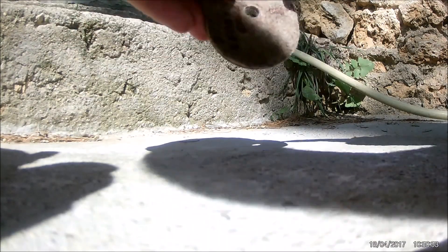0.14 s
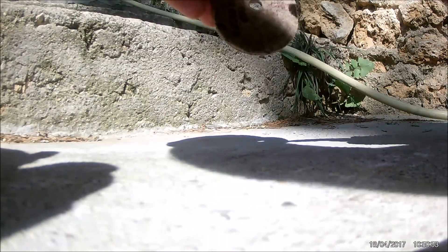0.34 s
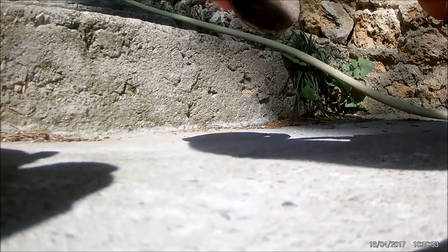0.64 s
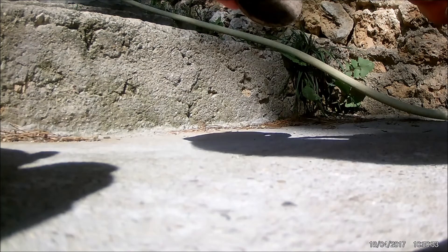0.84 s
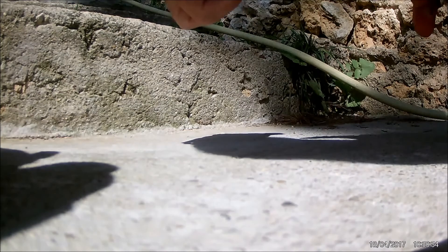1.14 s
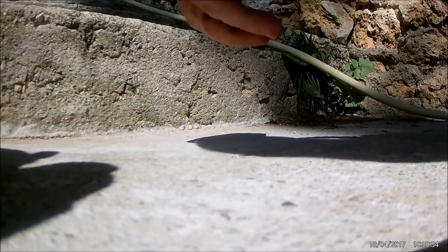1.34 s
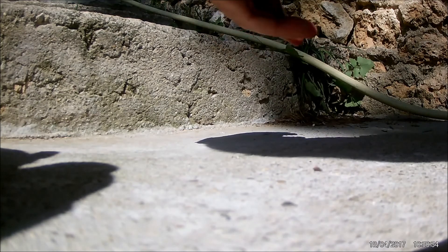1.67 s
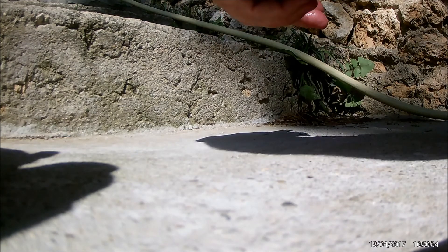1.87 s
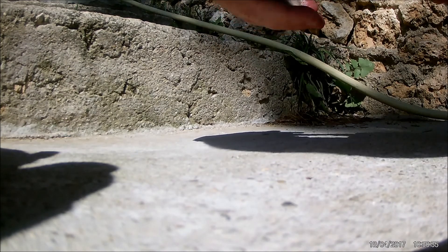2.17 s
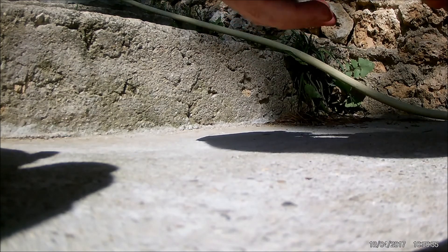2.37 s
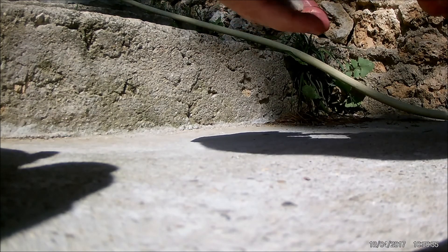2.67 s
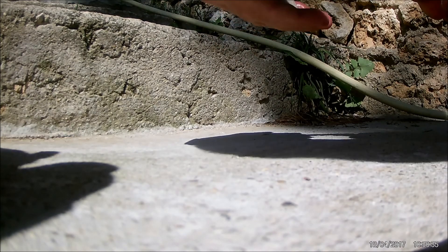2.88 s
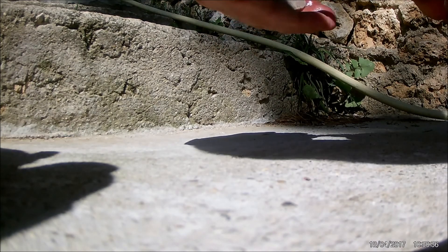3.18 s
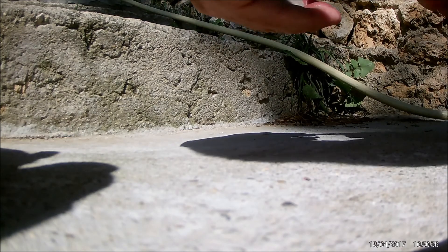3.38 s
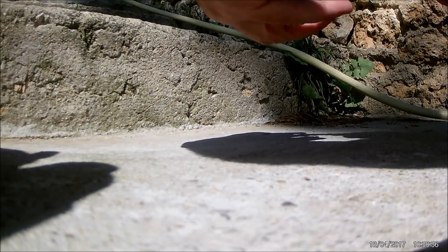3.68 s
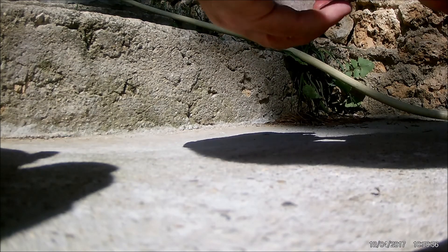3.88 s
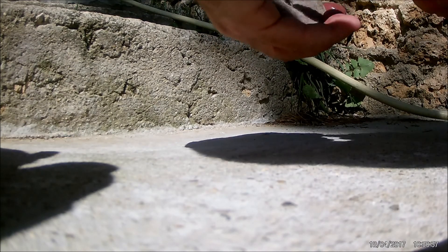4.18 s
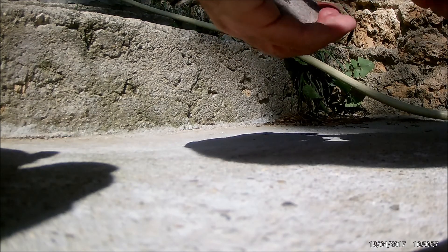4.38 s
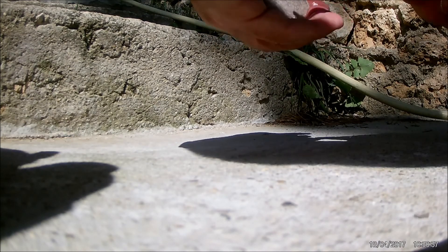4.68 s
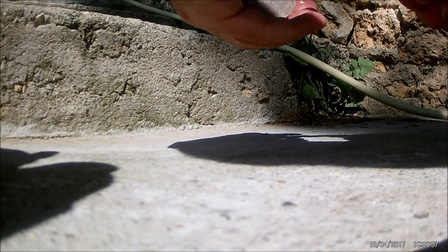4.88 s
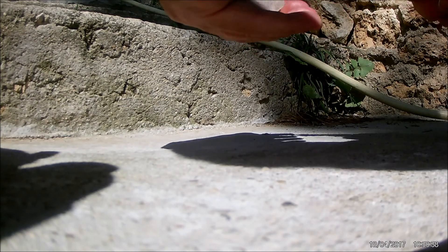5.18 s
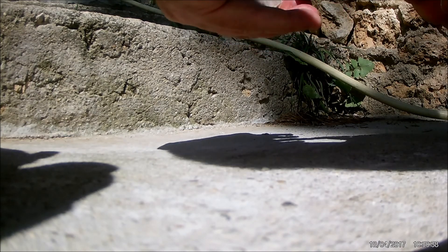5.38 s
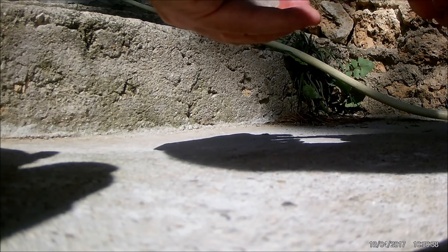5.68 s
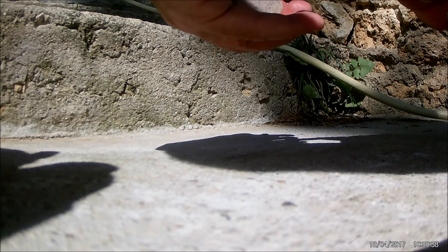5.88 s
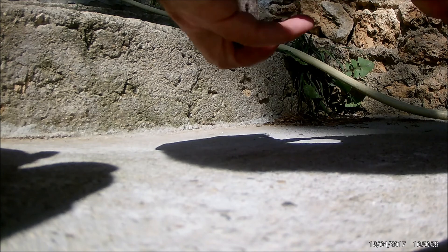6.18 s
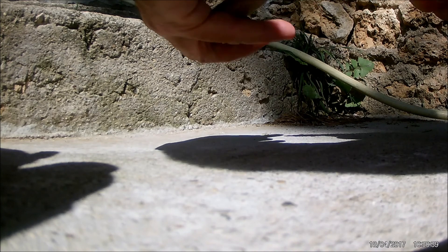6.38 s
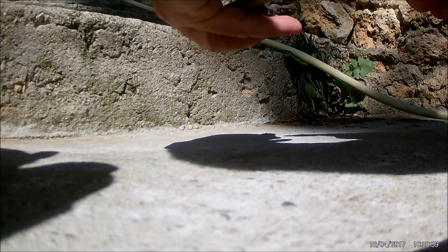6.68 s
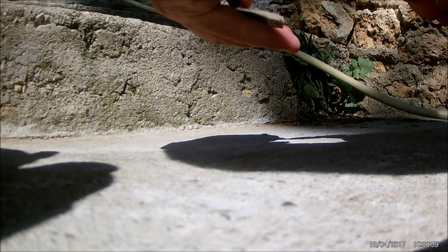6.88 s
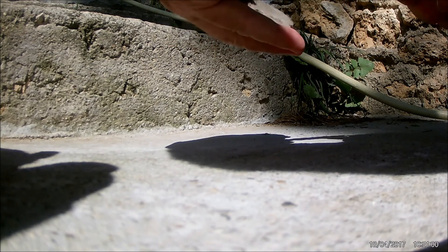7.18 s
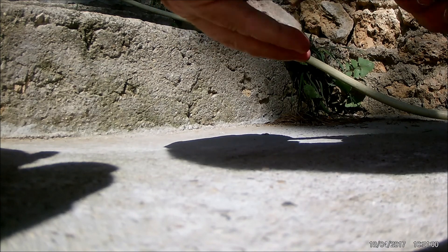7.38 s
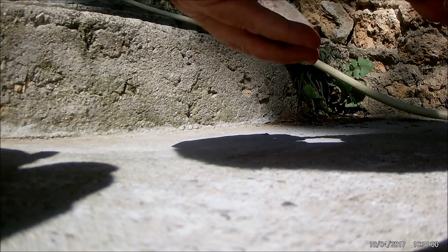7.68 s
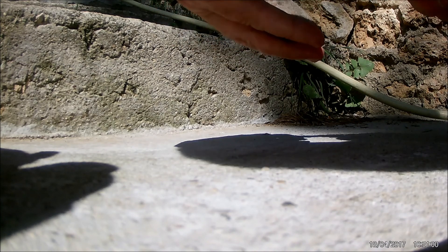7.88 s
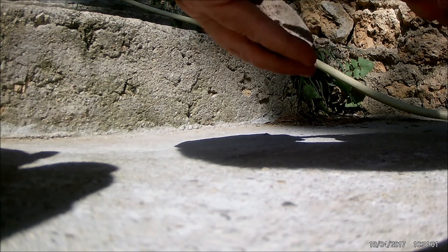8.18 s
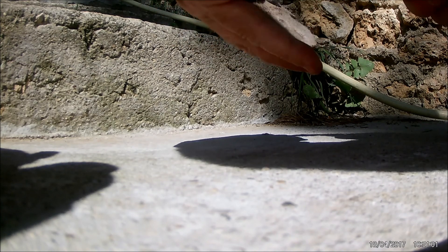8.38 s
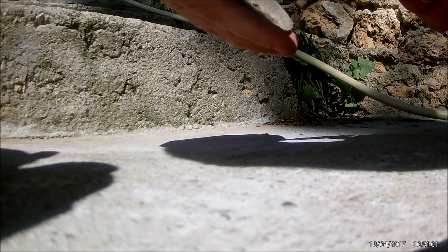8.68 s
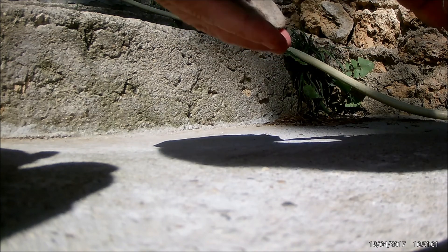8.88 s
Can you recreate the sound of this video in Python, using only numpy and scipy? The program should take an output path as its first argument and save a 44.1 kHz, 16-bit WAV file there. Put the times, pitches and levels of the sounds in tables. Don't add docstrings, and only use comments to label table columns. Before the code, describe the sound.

Outdoors and very close to a small microphone, a compressed-air gun sprays a pleated filter. Rough roaring hiss swells at once, with low wind thumps, then stops briefly after a second with small trigger clicks. It bursts back with a short whistle, then continues in uneven flares, quick rhythmic waves midway, and choppy short puffs toward the end.

```python
import sys
import numpy as np
from scipy import signal
from scipy.fft import rfft, irfft
from scipy.io import wavfile
from scipy.ndimage import uniform_filter1d

SR = 44100
rng = np.random.default_rng(int(sys.argv[2]) if len(sys.argv) > 2 else 0)


def magnitude_from_level(level_db):
    exponent = np.asarray(level_db, float) / 20
    return 10 ** exponent


def transcribe(u):
    v = np.clip(np.atleast_2d(u).T, -1, 1)
    q = np.round(v * 32767).astype(np.int16)
    wavfile.write(sys.argv[1], SR, q)


N = 398663
T = np.arange(N) / SR
ECHO_LAG = 20

# released_s, pressed_again_s
TRIGGER_S = (1.033, 1.2598)
# time_s, lower_hiss_db, topmost_fizz_db
FACE_TURN = [(0, 1, 0), (1.4, 0, -1), (1.57, 4, -3), (1.7, 1, -2), (2.1, 2.5, -1), (2.5, -1.5, 1),
             (3.4, 0.5, 8), (3.7, 2.5, -14), (4.0, 2.5, -7), (4.6, -0.7, -2), (5.6, -1.2, 5),
             (5.76, -1.5, 1), (5.95, 2.5, -3), (6.3, 1, 3.5), (7.4, 1.2, 5), (8.2, -1, -2), (9.04, 2.5, 6)]


def evened(x):
    return x / np.sqrt(np.mean(x ** 2) + 1e-20)


def drift(shape, spans):
    x = rng.standard_normal(shape)
    for axis, span in enumerate(spans):
        x = uniform_filter1d(uniform_filter1d(x, span, axis), span, axis)
    return evened(x)


def turbulence(power_of, patchy_db, flicker_db, wander, size=512, centre=((0, 1), (1, 1))):
    frames = 4 * N // size + 5
    hz = np.fft.rfftfreq(size, 1 / SR)
    slide = np.interp(np.arange(frames) * size / 4 / SR, *np.transpose(centre))
    slide = slide + wander * drift((frames,), (12,))
    field_db = patchy_db * drift((frames, len(hz)), (6, 4))
    field_db = field_db + flicker_db * drift((frames, 1), (2,))
    z = rng.standard_normal((frames, len(hz))) + 1j * rng.standard_normal((frames, len(hz)))
    z *= np.sqrt(power_of(hz / slide[:, None])) * magnitude_from_level(field_db)
    return evened(signal.istft(z.T, nperseg=size, noverlap=3 * size // 4)[1][:N])


def modes(rows, steep):
    return lambda hz: sum(magnitude_from_level(db) ** 2 / (1 + (2 * (hz - f) / width) ** 2) ** steep
                          for f, width, db in rows)


def bumps(times, rises, falls, dbs):
    t = np.arange(0, N + 32, 32)[:, None] / SR
    bell = np.exp(-.4 * abs((t - times) / np.where(t < times, rises, falls)) ** 2.5)
    return np.array([np.interp(T, t[:, 0], bell @ magnitude_from_level(db) ** 2) for db in dbs])


def valve():
    since_release = np.maximum(T - TRIGGER_S[0], 0)
    until_press = np.maximum(TRIGGER_S[1] - T, 0)
    closing = magnitude_from_level(-2600 * since_release) + magnitude_from_level(-21 - 370 * since_release)
    opening = magnitude_from_level(-14000 * until_press) + magnitude_from_level(-19 - 3000 * until_press)
    return np.minimum(closing + opening, 1)


def yard():
    # pitch_hz, level_db (per Hz)
    air_spectrum = [(22, -2), (110, 5), (200, -12), (1500, -10), (2430, -19), (6530, -22), (8040, -36),
                    (15000, -36)]
    f, db = np.transpose(air_spectrum)

    def power(hz):
        return magnitude_from_level(np.interp(np.log(hz + 1), np.log(f), db)) ** 2

    return magnitude_from_level(-72) * turbulence(power, 1.8, 1.4, 0., size=1024)


def wind():
    # time_s, level_db
    gusts = [(0, -40), (.3, -72), (.95, -59.5), (1.5, -78), (2.1, -80), (2.7, -62), (3.0, -70),
             (4.0, -57.5), (4.35, -66), (4.7, -55), (5.7, -55.5), (6.1, -65), (7.3, -63), (7.7, -55),
             (8.2, -59.5), (9.04, -56.5)]
    # time_s, level_db, length_ms
    buffets = [(.042, -44, 8.7), (0.059, -33, 9), (0.11, -39, 13), (3.066, -39, 2.3), (3.3, -45, 4.8),
               (.685, -48, 4.5), (3.2, -52, 8), (3.092, -56, 13), (3.49, -45, 5), (3.822, -51, 9.1),
               (4.16, -54, 7.5), (4.29, -51, 5), (4.335, -51, 6), (3.62, -51, 9), (0.15, -50, 8.9),
               (0.234, -48, 16), (0.73, -50, 11.4), (0.877, -46.5, 8.3), (0.67, -41.5, 13),
               (0.833, -37, 14), (1.267, -47, 7.3), (1.326, -45.5, 15), (1.365, -51, 6.1), (3.696, -55, 14),
               (3.852, -51, 14), (3.895, -50, 8.2), (4.729, -44.5, 7.3), (4.824, -44.5, 8.9),
               (4.987, -58, 15), (5.114, -48, 23), (5.25, -42.5, 13.4), (5.338, -49, 9.4), (5.382, -45, 11),
               (5.472, -52, 13), (5.532, -41, 9.2), (0.6, -52, 14), (7.68, -56, 9.4), (5.704, -56, 12.0),
               (5.838, -35.5, 9.7), (5.984, -38, 10.5), (4.6, -54, 13), (2.72, -57, 12), (8.96, -55, 14),
               (7.635, -58, 22), (.695, -44.5, 4.4), (0.21, -52, 3.6), (5.63, -45.5, 4.5),
               (6.45, -40.5, 3.2), (6.37, -46, 5.1), (5.21, -46, 3.3), (8.33, -52, 2.9), (8.41, -48, 2.6)]
    rumble = turbulence(modes([(45, 70, -12.5), (141, 180, -10.0)], 1.5), 2.7, 3.6, 0.13, size=2048)
    out = magnitude_from_level(np.interp(T, *np.transpose(gusts))) * rumble * valve()
    t = np.arange(-.06, .06, 1 / SR)
    for (s, db, ms), turn in zip(buffets, rng.random(len(buffets))):
        cycles = t / (ms / 1000)
        push = np.cos(2 * np.pi * (0.79 * cycles + 0.2 * turn) + np.pi)
        push = push + .35 * drift((len(t),), (130,))
        thump = magnitude_from_level(db + 3.0) * np.exp(-.5 * cycles ** 2) * push
        at = round((s - .06) * SR)
        out[max(at, 0):at + len(t)] += thump[max(-at, 0):]
    return out


def ticks():
    # time_s, peak_db, ring_hz, t60_s, snap_db, snap_treble_db
    clicks = [(1.052, -44, 1480, .014, -8, -9), (1.0762, -44, 4270, .005, 3, -6),
              (1.0882, -44, 1700, 0.0077, 5, -7), (1.111, -58, 1400, .015, -6, -12),
              (1.1248, -38, 1110, 0.024, -1, -23), (1.146, -69, 5000, .006, 3, -6),
              (1.183, -53, 1200, 0.02, 0, -20), (1.189, -47, 1100, .018, -8, -20),
              (1.2168, -44, 1550, 0.0093, 4, -14), (1.2245, -65, 4900, .012, 1, -3),
              (1.229, -58, 1500, .01, -6, -10), (1.2385, -58, 5000, .006, 3, -10)]
    out, t = np.zeros(N), np.arange(1500) / SR

    def noise_band(low_hz, high_hz):
        band = signal.butter(3, [low_hz / SR * 2, high_hz / SR * 2], "band")
        return signal.lfilter(*band, rng.standard_normal((len(clicks), len(t))))

    snaps, airs = noise_band(2200, 7000), noise_band(8500, 13000)
    for (s, db, hz, t60, snap_db, air_db), snap, air in zip(clicks, snaps, airs):
        ring = np.sin(2 * np.pi * hz * t) + 0.3 * np.sin(2 * np.pi * 1.66 * hz * t)
        ring = ring * magnitude_from_level(-60 * t / t60) * (1 + 0.77 * drift((len(t),), (14,)))
        snap_decay = magnitude_from_level(snap_db - 9200 * t) + magnitude_from_level(snap_db - 23 - 1200 * t)
        click = ring + snap_decay * (snap + magnitude_from_level(air_db) * air)
        out[round(s * SR):][:len(t)] += magnitude_from_level(db - 4.5) * click * np.minimum(t / 0.00037, 1)
    return out


def whistle():
    # time_s, pitch_hz, level_db, half_length_ms
    blasts = [
        (1.375, 1057, -22, 26),
        (1.36, 800, -28.5, 29),
        (6.29, 680, -34, 13),
    ]
    waver, swell = drift((N,), (300,)), drift((N,), (250,))
    out = np.zeros(N)
    for s, hz, db, ms in blasts:
        bell = np.exp(-.5 * ((T - s) / (ms / 1000)) ** 2)
        phase = 2 * np.pi * np.cumsum(hz * (1 + .012 * waver)) / SR
        out += magnitude_from_level(db + 2.6 * swell) * bell * np.sin(phase)
    return out


def steady_flow():
    # time_s, roar_db, clear_of_pleats_db
    between_passes = [(0, -34.5, 7), (0.199, -43, 9), (.5, -40, 1), (1.04, -37, 1.5), (1.26, -30.5, -2.5),
                      (1.55, -26, -2.5), (1.828, -37, 1), (2.2, -35.5, 2.5), (2.5, -37.5, -3),
                      (3.0, -39, 0), (3.6, -41, 2), (4.4, -42.5, -1), (5.1, -36, -1), (5.8, -38.5, -0.5),
                      (6.299, -31.5, -1), (6.75, -43.5, 0.5), (7.002, -33.5, 3), (9.04, -46, -1.5)]
    # time_s, drop_db, half_width_ms
    lulls = [(.15, 3, 73), (2.37, 8.5, 53), (2.52, 2.5, 41), (3.25, 4, 72), (4.24, 0.5, 30), (4.79, 3, 25),
             (5.04, 0.5, 25), (5.18, 1, 20), (5.76, 1, 37), (5.92, 1.5, 30), (7.35, 5, 90), (7.52, 4.5, 42),
             (7.87, 0.5, 58), (8.2, 2, 61), (8.48, 10, 36), (.77, 1.5, 22), (3.56, 1.5, 20), (7.78, 0, 12),
             (4.93, 1.5, 30), (7.171, 5.5, 6.4), (7.96, 2.5, 23), (9.03, 6, 37)]
    following = [
        (-42, 0.69, 1.2),
        (-48, 0.5, 0.11),
        (-47, 0.32, .7),
    ]
    usual_roar_db = -39.5
    s, roar_db, clear_db = np.transpose(between_passes)
    lull_db = sum(db * np.exp(-.5 * ((T - at) / (ms / 1000)) ** 2) for at, db, ms in lulls)
    roar_db = np.interp(T, s, roar_db) - lull_db
    clear_db = np.interp(T, s, clear_db) - 0.62 * lull_db
    layers_db = [roar_db]
    for db, roar_share, clear_share in following:
        layers_db.append(db + roar_share * (roar_db - usual_roar_db) + clear_share * clear_db)
    power = magnitude_from_level(np.array(layers_db)) ** 2
    power[3] *= magnitude_from_level(-14 * np.exp(-((T - TRIGGER_S[0]) / 0.085) ** 2))
    return power


def pleat_passes():
    # time_s, roar_db, rise_ms, fall_ms
    square = [(.103, -28.5, 29, 21.6), (1.662, -25.5, 18, 6.4), (2.053, -32, 37, 18),
              (2.261, -36.5, 25, 16), (3.41, -43, 13, 47), (6.86, -34.5, 11, 7), (7.595, -40, 11, 6.5),
              (3.728, -42, 3, 8), (3.486, -27, 3.6, 16), (3.822, -27.5, 3, 4), (6.155, -31, 43, 12),
              (6.689, -36, 15, 15), (6.8, -30.5, 14, 26), (7.188, -39, 1.9, 16), (7.255, -24.5, 2, 5),
              (7.329, -35, 5.8, 2.7), (7.399, -27, 2.5, 9.9), (7.45, -35, 19, 17), (7.492, -26, 3.2, 3.8),
              (7.632, -28, 6.2, 1.6), (7.718, -38, 8.1, 19), (7.903, -37.5, 30, 18), (8.124, -36, 13, 17.2),
              (8.34, -40, 55, 34), (8.59, -47, 7.5, 3.9), (8.707, -38, 14, 17), (8.976, -31.5, 9.9, 10)]
    waved = [
        (4.832, -23, 9.8, 12),
        (4.981, -26.5, 14.6, 9.5),
        (5.118, -25, 19.4, 11.6),
        (5.266, -24, 15, 8.6),
        (5.345, -30, 6.8, 4.3),
        (5.413, -26.5, 19, 8),
        (5.547, -27.5, 17, 13),
        (5.624, -27.5, 4.7, 9),
        (5.839, -24.5, 8.5, 8.5),
        (5.992, -23.5, 12, 6.9),
    ]
    glancing = [(.261, -25, 23, 14), (.37, -26, 50, 58), (.455, -37.5, 27, 26), (1.882, -23.5, 21, 28),
                (2.426, -36, 34, 23), (2.562, -39.5, 7.2, 42), (2.73, -35.5, 21, 38),
                (3.622, -28, 6.5, 6.4), (3.767, -34.5, 3, 10), (3.886, -38, 21, 10), (3.929, -39, 9.7, 11),
                (4.481, -37, 24, 13), (4.622, -35.5, 3.7, 2.9), (4.66, -62, 18, 37),
                (5.688, -27, 5.3, 11.7), (6.948, -27, 7.8, 9.4), (7.099, -26, 2.6, 8.3),
                (7.556, -32, 10, 14), (7.815, -37, 7.6, 16), (8.362, -36, 12, 18), (8.423, -45, 3.3, 15),
                (8.49, -40.5, 21, 9)]
    deep = [(1.39, -23.5, 80, 47), (1.572, -26, 31, 20), (3.072, -37, 12, 17), (3.213, -41.5, 24, 35),
            (4.073, -36.5, 15, 6.2), (5.495, -27, 14, 4.8), (6.31, -24.5, 43, 16), (6.291, -22, 7, 9),
            (1.35, -25.5, 25, 25), (6.466, -20.5, 22, 14), (6.52, -32.5, 27, 33)]
    pinched = [
        (6.91, -30, 9.9, 8.1),
        (7.013, -30.5, 11, 6),
        (5.9, -28.5, 8.8, 8),
        (7.15, -33.5, 17, 10),
        (7.58, -33, 8, 8),
        (7.048, -27.5, 5.4, 10),
        (7.369, -34, 5.3, 2.3),
        (8.045, -32, 10, 13),
        (8.203, -36.5, 14, 7.7),
        (8.871, -41, 2.4, 4.5),
    ]
    booming = [
        (.17, -39, 37, 140),
        (.607, -40, 11, 6.3),
        (2.36, -50.5, 30, 100),
        (3.066, -38, 6, 5.5),
        (4.661, -40, 2.4, 2.9),
        (5.63, -44, 27, 43),
        (6.604, -29.5, 20.6, 3.2),
        (6.65, -38, 31, 58),
        (7.49, -42.5, 50, 17),
        (8.47, -48.5, 113, 63),
    ]
    skimming = [(.45, -37, 10, 8.8), (.68, -42.5, 27, 17), (1.49, -45, 16, 18), (1.77, -48, 18, 17.5),
                (1.97, -46.5, 14, 12), (2.33, -56, 15, 15), (4.41, -54, 12, 16), (4.69, -42.5, 5, 7.7),
                (6.05, -49.5, 16, 13), (7.31, -48, 13, 13), (8.17, -52, 20, 17), (8.81, -56, 20, 28),
                (2.69, -41, 6.3, 6.5), (3.09, -47.5, 18, 10)]
    covered = [
        (3.688, -24, 9.1, 3.3),
        (4.183, -32.5, 1.7, 16),
        (4.318, -31, 3.1, 23),
        (4.8, -34, 4, 10),
        (4.729, -24.5, 4.5, 2.7),
        (3.517, -28.5, 8.7, 5.3),
        (6.425, -24.5, 11, 8),
        (5.23, -34, 8.1, 9.4),
        (8.395, -37.5, 8.3, 5.4),
        (3.6, -38, 10, 5.8),
    ]
    # hiss_db, hollow_db, fizz_db
    colours = [
        (-6, -12, -15),
        (-6.5, -11.5, -12),
        (-6, -19, -11.5),
        (-18.5, -10, -39),
        (-16, -21, -24),
        (-30, -1.5, -18),
        (3.5, -20, -5.5),
        (-11, -12, -16),
    ]
    kinds = (square, waved, glancing, deep, pinched, booming, skimming, covered)
    events = [[*row, *colour] for rows, colour in zip(kinds, colours) for row in rows]
    at, peak_db, rise_ms, fall_ms, hiss_db, hollow_db, fizz_db = np.transpose(events)
    hiss_lag = 0.15
    hiss_db = hiss_db - hiss_lag * (peak_db + 27.0)
    fizz_db = fizz_db - 1.2 * hiss_lag * (peak_db + 32.0)
    return bumps(at, rise_ms / 1000, fall_ms / 1000, peak_db + [0 * at, hiss_db, hollow_db, fizz_db])


def shading():
    # time_s, drop_db
    shades = [(.38, 7), (.93, 2), (1.37, 11), (1.91, 9.5), (2.15, 6), (2.51, 7), (3.03, 3), (3.19, 11),
              (3.35, 4), (3.99, 3), (4.249, 7), (4.81, 5), (5.65, 1.5), (6.24, 1), (7.12, 4.5), (7.44, 5),
              (7.6, 7), (7.76, 6), (7.901, 8.5), (8.05, 4), (8.38, 3.5), (8.52, 4.5), (.61, 2), (2.05, 5.5),
              (4.39, -0.5), (5.33, 3), (5.77, 0.5), (6.97, 5), (7.29, 1)]
    half_width_s = 0.023
    return sum(db * np.exp(-.5 * ((T - at) / half_width_s) ** 2) for at, db in shades)


def roar():
    # pitch_hz, width_hz, level_db
    roar_modes = [(1087, 164, -3.5), (1360, 200, -0.5), (1550, 150, 1), (1836, 500, -4.5), (2036, 180, -5),
                  (2383, 160, -13)]
    # time_s, pitch_factor (ratio)
    pleat_depth = [(0, 1), (.5, 1), (1.3, 1.02), (1.4, 0.92), (1.5, 1.07), (1.89, 1.09), (2.0, 0.99),
                   (3.6, 1.03), (3.69, 0.94), (4.78, 1.03), (4.83, 1.07), (4.9, 1.047), (6.4, 1.054),
                   (6.6, 0.99), (6.8, 1.026), (7.75, 1.02), (7.88, 1.05), (9.04, 1.01)]
    return turbulence(modes(roar_modes, 1.485), 1.6, 0.8, 0.015, size=1024, centre=pleat_depth)


def hiss(echo_share, shade_db):
    # pitch_hz, width_hz, level_db
    hiss_modes = [(3854, 500, -1.5), (4350, 1400, -6), (5580, 530, -2.5), (6265, 1100, 0.5),
                  (7490, 270, -4)]
    out = turbulence(modes(hiss_modes, 1.05), 1.7, 1.0, 0.015)
    s, lower_db, _ = np.transpose(FACE_TURN)
    lower = signal.sosfiltfilt(signal.butter(3, 5200, fs=SR, output="sos"), out)
    out = out + (magnitude_from_level(np.interp(T, s, lower_db)) - 1) * lower
    out = (out + echo_share * np.roll(out, ECHO_LAG)) / np.sqrt(1 + echo_share ** 2)
    return out * magnitude_from_level(-0.34 * shade_db)


def hollow():
    # pitch_hz, width_hz, level_db
    hollow_modes = [(183.5, 120, -11.5), (378, 93, -6), (567, 140, 0.5), (792, 310, -0.5)]
    return turbulence(modes(hollow_modes, 1.72), 1.9, 1.3, 0.045, size=1024)


def fizz(shade_db):
    # pitch_hz, width_hz, level_db
    fizz_modes = [(9610, 1250, -2), (10880, 2500, -3.5), (11690, 380, -2), (13600, 1200, -17)]
    out = turbulence(modes(fizz_modes, 1.6), 1.9, 1.0, 0.013)
    s, _, top_db = np.transpose(FACE_TURN)
    top = signal.sosfiltfilt(signal.butter(3, 13400, "high", fs=SR, output="sos"), out)
    out = out + (magnitude_from_level(np.interp(T, s, top_db)) - 1) * top
    return out * magnitude_from_level(-shade_db)


def pleat_edge(steady_roar, roar_flare, echo_share):
    # pitch_hz, width_hz, level_db
    edge_modes = [(2890, 1600, -1), (5100, 3500, -11)]
    level = magnitude_from_level(-6.5) * (magnitude_from_level(-2.5) * steady_roar + roar_flare) ** 0.58
    edge = level * turbulence(modes(edge_modes, 1.6), 1.6, 1.0, 0.014)
    open_share = echo_share * steady_roar / (steady_roar + roar_flare)
    return edge + open_share * np.roll(edge, ECHO_LAG)


def jet():
    # time_s, share (0-1)
    ground_echo = [(0, 0.11), (1.3, 0.16), (1.75, 0.36), (2.1, 0.4), (2.8, 0.27), (3.2, 0.4), (3.6, 0.36),
                   (4.5, 0.6), (4.9, 0.34), (5.2, 0.25), (5.75, 0.4), (6.1, .3), (7, 0.32), (7.5, 0.36),
                   (8, .5), (8.4, 0.5), (9.04, 0)]
    echo_share = np.clip(np.interp(T, *np.transpose(ground_echo)), 0, 1)
    steady, flares = steady_flow(), pleat_passes()
    shade_db = shading()
    layers = [roar(), hiss(echo_share, shade_db), hollow(), fizz(shade_db)]
    body = (np.sqrt(steady + flares) * layers).sum(0)
    return (body + pleat_edge(steady[0], flares[0], echo_share)) * valve()


def scene():
    return (yard() + wind() + ticks() + whistle() + jet())[None]


def top_cut(x):
    return signal.sosfilt(signal.butter(12, 15550, fs=SR, output="sos"), x)


def record(dry):
    # pitch_hz, half_width_hz, depth (0-1)
    path_dips = [
        (7960, 400, .975),
        (13420, 320, .96),
        (15600, 650, .991),
        (13000, 420, .45),
        (7960, 120, .6),
        (1735, 55, .45),
        (5820, 170, .3),
        (2120, 50, .25),
    ]
    hz = np.fft.rfftfreq(N, 1 / SR)
    gain = np.prod([1 - depth * np.exp(-((hz - f) / half) ** 2) for f, half, depth in path_dips], 0)
    limited = 0.18 * np.tanh(dry[0] / 0.2)
    mix = irfft(rfft(limited) * gain, N)[None]
    return top_cut(mix)


dry = scene()
out = record(dry)
transcribe(out)
```